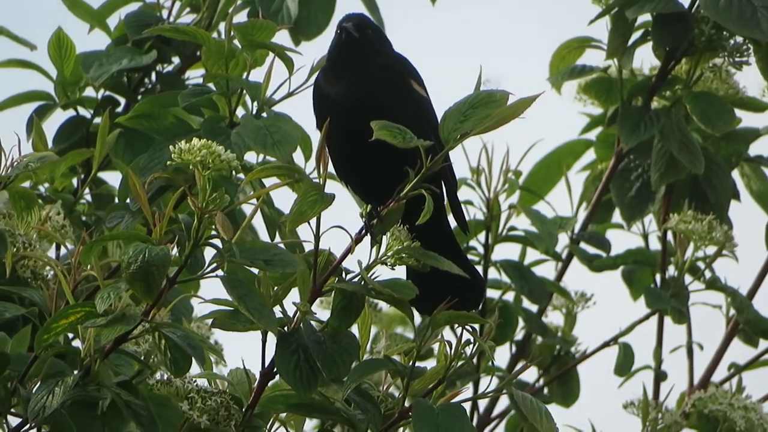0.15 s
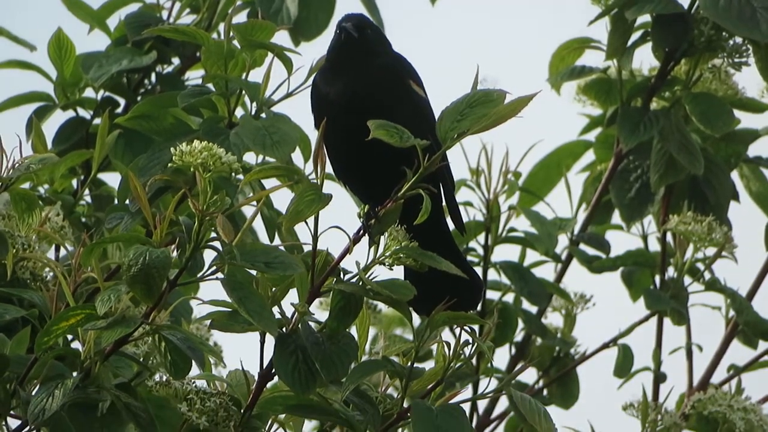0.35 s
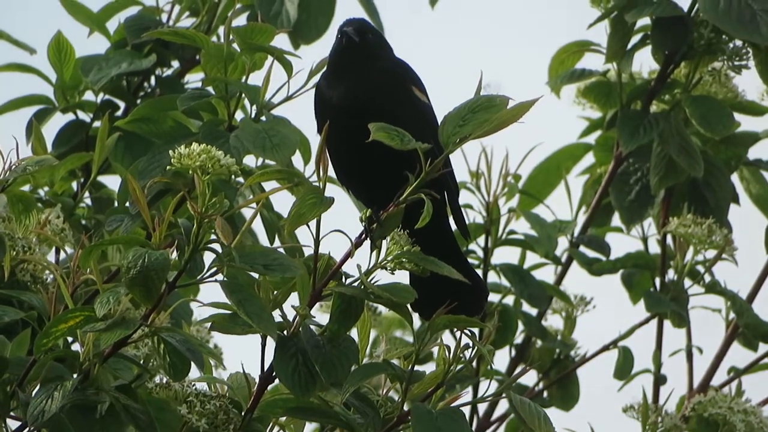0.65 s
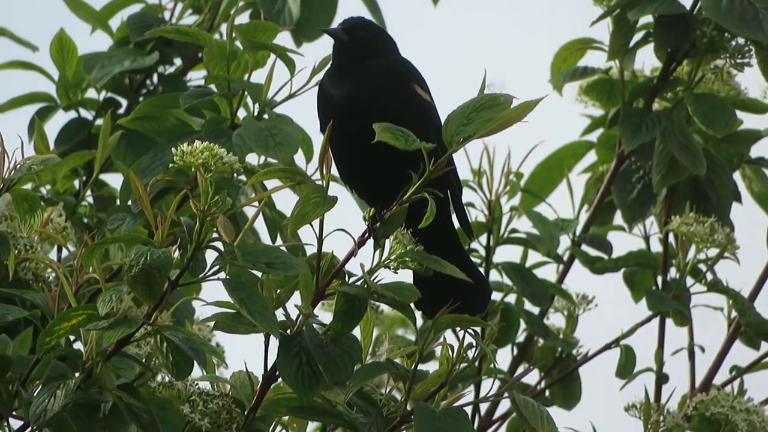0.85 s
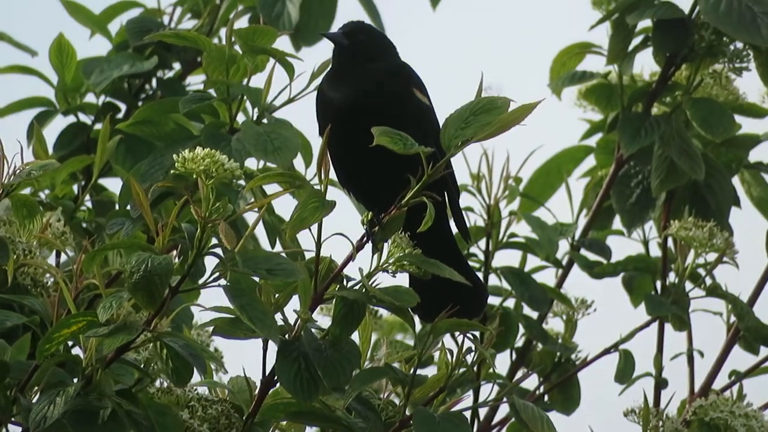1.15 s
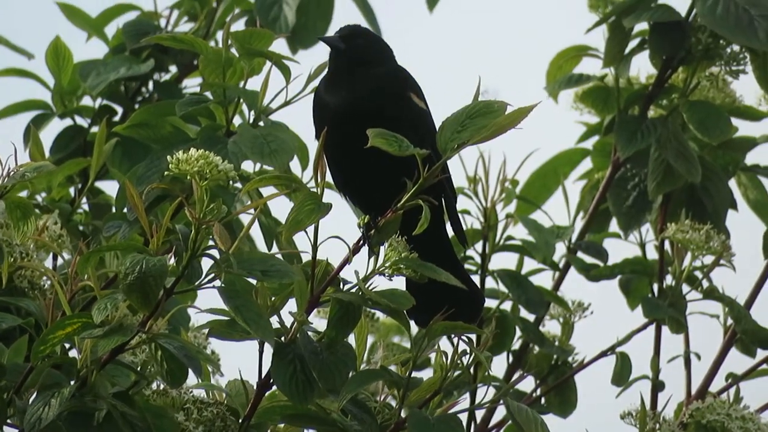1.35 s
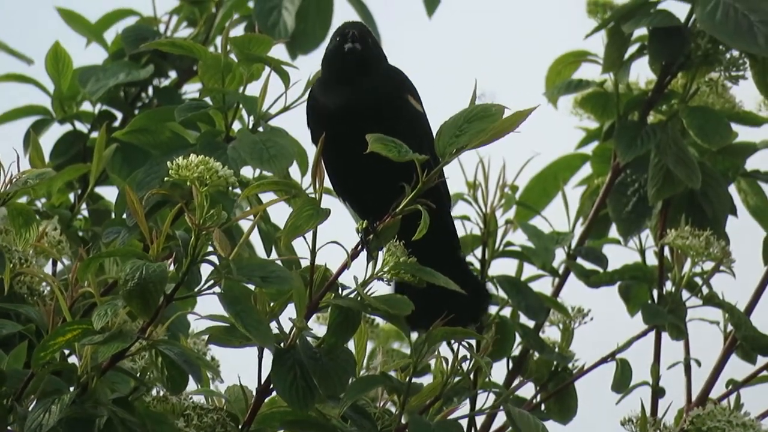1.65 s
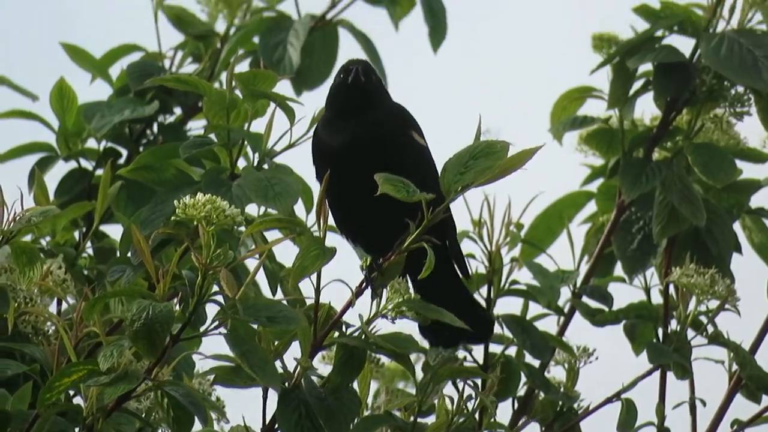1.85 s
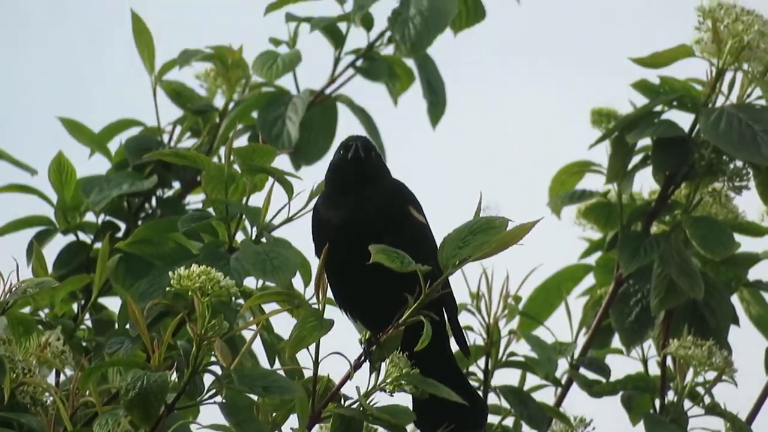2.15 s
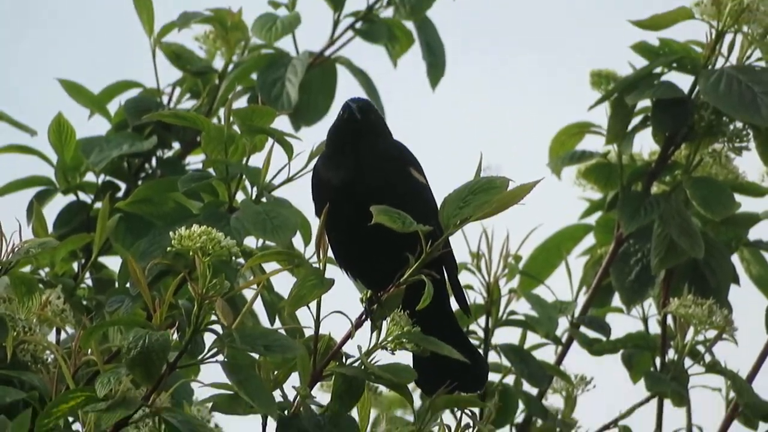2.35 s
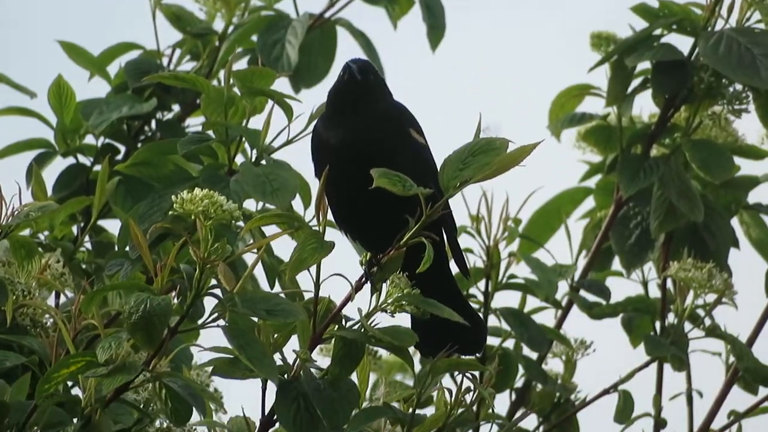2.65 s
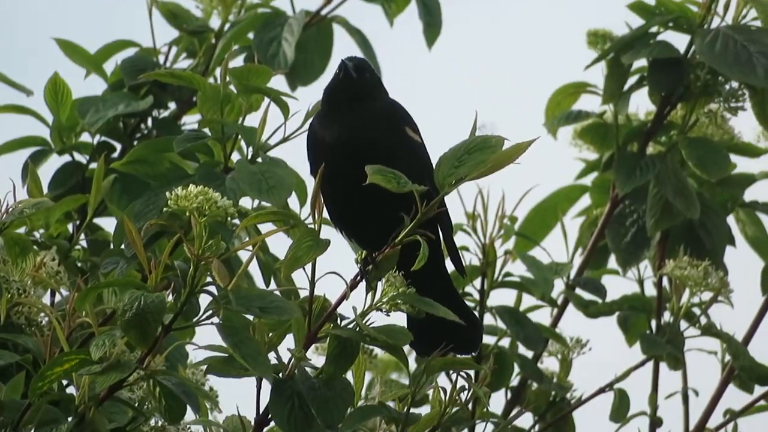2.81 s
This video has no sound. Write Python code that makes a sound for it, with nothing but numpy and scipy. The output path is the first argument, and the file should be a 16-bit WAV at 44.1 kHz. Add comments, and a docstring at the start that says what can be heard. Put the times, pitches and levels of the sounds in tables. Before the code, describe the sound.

Short dry chack calls from a bird in leafy foliage, the middle one by far the loudest, with faint chirps mostly to the right, soft traffic wash and machine hum, heard in stereo outdoors.

```python
"""A blackbird in a leafy bush gives one loud, harsh, nasal chack, with a softer one before and another after.
Each is a harmonic stack with breath noise that sags in pitch and shuts with a rough downward snap.
Other birds, farther off, whistle, buzz and chirp as frequency-modulated sines; foliage scatters every call.
Beneath lie shaped noise, for a low rumble and the wash of distant traffic, and the wavering tones of a
faint machine hum."""
import sys
import numpy as np
from scipy import signal
from scipy.fft import rfft, irfft
from scipy.io import wavfile
from scipy.ndimage import uniform_filter1d

SR = 44100
rng = np.random.default_rng(int(sys.argv[2]) if len(sys.argv) > 2 else 0)


def generate_wav(sig):
    """Save sig (samples, or channels by samples) to the path in sys.argv[1] as 16-bit PCM at SR."""
    pcm = np.round(np.clip(np.atleast_2d(sig).T, -1, 1) * 32767).astype(np.int16)
    wavfile.write(sys.argv[1], SR, pcm)


N = 131418  # samples in the scene

# Spectrum of the rumble and wash, density before scaling: freq_hz, relative_density_db
AIR_SPECTRUM = [(8, -45), (22, -24), (30, -16), (41, -9.5), (53, -1.5), (64, -.5), (84, -5), (112, -6.5),
                (171, -15), (200, -17.5), (270, -17), (375, -21.5), (430, -26), (534, -30.5), (811, -26),
                (1000, -30), (1670, -38.5), (2400, -41.5), (4300, -45.5), (7000, -52), (11700, -59),
                (15500, -68.5)]
# Correlation of the background between left and right: freq_hz, correlation (0-1)
STEREO_LIKENESS = [(150, 0.99), (250, 0.98), (500, 0.8), (1000, 0.92), (2000, 0.17), (4000, 0.21),
                   (8000, 0.21), (15000, 0.25)]
# Slow swell of the traffic wash, full in the bass: time_s, relative_level_db
TRAFFIC_SWELL = [(0, 0), (.8, 0.5), (1.4, 0.9), (2.0, 1), (2.5, -0.1), (2.98, -1)]
# Tones of the machine hum, before wavering: pitch_hz, level_db, wander_hz
HUM_TONES = [(61, -41, 5.7), (99, -43.5, 3.27), (121.4, -49, 3.52), (263, -57, 2.9), (394.5, -51, 0.92),
             (444, -59.5, 0.76)]
# Frequency response of the foliage scatter: freq_hz, relative_level_db
SCATTER_RESPONSE = [(1000, -9), (2500, -1), (3700, 0.5), (4700, 3.5), (5600, -1), (15000, 2)]
# Curves of three whistles, before random motion and trill: time_s, pitch_hz, level_db, trill_depth_hz
SLURRED_WHISTLE = [(1.588, 4230, -60, 200), (1.602, 3980, -48, 250), (1.62, 3900, -51, 230),
                   (1.64, 3880, -49.5, 220), (1.67, 3765, -48.5, 210), (1.70, 3784, -49, 150),
                   (1.727, 3940, -46, 20), (1.745, 4010, -56, 10), (1.762, 4000, -48.5, 10),
                   (1.782, 4060, -58, 10)]
THIN_WHISTLE = [(.15, 4750, -63, 20), (.185, 4780, -58, 20), (.235, 4740, -62, 60), (.25, 4950, -57, 180),
                (.26, 4700, -51.5, 220), (.278, 5200, -58.5, 180), (.29, 4900, -64, 150),
                (.296, 4230, -59, 80), (.31, 3900, -66, 50)]
WARBLE_WHISTLE = [(0.936, 3400, -65, 30), (.968, 2930, -55.5, 30), (.997, 3340, -61, 30),
                  (1.018, 2980, -61, 30)]
# Buzzy notes, pitch after the scoop and level before the fade:
# start_s, length_s, pitch_hz, level_db, flutter_hz, depth_hz, rasp_hz
BUZZ_NOTES = [(0.925, 0.049, 4800, -57, 150, 150, 180), (1.568, 0.057, 4800, -53.5, 153, 200, 240),
              (1.928, 0.074, 3870, -57.5, 150, 80, 50), (1.985, 0.12, 4340, -52, 319, 280, 60.3),
              (2.105, 0.08, 4300, -60, 312, 260, 60), (2.342, 0.14, 4280, -52.5, 312, 270, 70),
              (2.497, 0.038, 4850, -51, 155, 150, 240), (2.685, 0.058, 4630, -55, 150, 200, 380)]
# Falling chirps: start_s, length_s, from_hz, to_hz, level_db
FALLING_CHIRPS = [(2.68, 0.018, 3400, 3000, -58), (2.73, 0.036, 3650, 2360, -50.5),
                  (2.846, 0.021, 6700, 5150, -58), (2.924, 0.034, 3720, 2330, -51)]
# Chacks, before the shared course: start_s, length_s, pitch_hz, rise (share of pitch),
# sag (power of the pitch course), level_db, snap_db, tilt_db_per_khz, left_lead_ms, left_minus_right_db, echo_db
CHACK_NOTES = [(0.0225, 0.038, 685, 0.031, 0.38, -44, 0, -2, 0.022, 0, -22),
               (1.8076, .0452, 675, 0, 1, -26.4, .6, 0, .006, .7, -14.5),
               (2.4455, .0425, 664, -0.0037, 0.56, -46.5, -1, 0, -0.045, -2.5, -11)]
# Course shared by every chack: place (share of length), pitch_ratio, effort_db, brightness_db, lower_resonance_db
CHACK_COURSE = [(0, 1.024, -2, 3.5, 5), (.27, 1.006, 1, 1.5, -.5), (.47, .976, -2, -1.5, -2.5),
                (.66, .995, -1.3, 0, -3), (.85, .998, -3.2, 1, 0), (1, 1.012, -2.5, 1, 3.5)]
# Harmonics of the chack, before scaling: harmonic (number), relative_level_db
VOICE_HARMONICS = [(1, -35), (2, -8.5), (3, -15), (4, -13), (5, -2.5), (6, -13), (7, 0.5), (8, -12.5),
                   (9, -13.5), (10, -25), (11, -31), (12, -29), (13, -29.5), (14, -29.5), (15, -40),
                   (16, -36), (17, -27.5), (18, -36), (19, -27), (20, -36), (21, -32), (22, -42), (23, -43)]
# Nearby reflections of the chacks: delay_s, relative_level_db
REFLECTIONS = [(.009, -19), (.021, -27), (.04, -24)]

# Background and hum
AIR_DB, PATCH_DB = -32.5, 1.55
MONO_BELOW_HZ, TRAFFIC_TOP_HZ = 150, 890
HUM_WAVER_DB = 1.3

# Foliage: time to decay by 60 dB, and delay before the first scatter
BUSH_T60_S, BUSH_DELAY_S = 0.19, 0.0077

# Far birds; scoop and flutter jitter are shares of the pitch and the flutter rate
TRILL_HZ, FLUTTER_JITTER, PULSE_DB_PER_HZ = 155, .025, .02
SCOOP, SCOOP_S, BUZZ_RISE_S, BUZZ_FADE_DB = 0.22, 0.011, .018, -7.5
CHIRP_BEND = 1.2  # power of the sweep
FAR_LEAD_MS, FAR_BALANCE_DB, FAR_ECHO_DB = -0.054, -2.6, -8.5
THIN_ECHO_DB = -13

# Chack voice; jitter is a share of pitch, shimmer a share of amplitude
ATTACK_S, JITTER, SHIMMER, BREATH_DB = .0003, .006, .09, -24
OPEN_S, OPEN_RASP_DB = .003, 12  # a burst of breath noise at the opening
RASP_DB, RASP_TILT_DB_PER_KHZ = 15, .5  # extra breath noise at the shut; treble tilt of all breath noise
FLICKER_DB, FLICKER_DB_PER_KHZ = .5, .2  # random level motion of each harmonic
DISPERSION_RAD = .55  # phase lag, times harmonic number squared
BRIGHT_FROM, BRIGHT_SPAN = 7.5, 1.8  # in harmonics: those above the strongest follow the brightness
LOWER_HZ, LOWER_WIDTH_HZ = 3700, 620  # lower throat resonance, prominent as the note opens and shuts

# Closing: the pitch drops by a share and turns rough as the note shuts
CLOSE_S, CLOSE_DROP, CLOSE_JITTER, RELEASE_S = 0.0077, 0.196, 0.018, 0.0031
# Meanwhile the upper resonance slides down and the harmonic stack fades
SNAP_END_HZ, SNAP_ROUGH, STACK_FADE_DB = 3573, 0.52, -4
# A tiny upward squeak just before each chack, its level relative to the chack's
LEAD_S, LEAD_LENGTH_S, LEAD_FROM_HZ, LEAD_TO_HZ, LEAD_DB = 0.0061, 0.0033, 2850, 4200, -21

EDGE_HZ = 15700  # upper limit of the band


def amp(db):
    """Logarithmic level: converts decibels to an amplitude ratio."""
    return 10 ** (np.asarray(db) / 20)


def unit(x):
    """Power normalisation: scales to rms 1."""
    return x / np.sqrt(np.mean(x ** 2) + 1e-20)


def read(points, hz):
    """Spectral interpolation on a logarithmic frequency axis."""
    f, value = np.transpose(points)
    return np.interp(np.log(hz + 1), np.log(f + 1), value)


def add(mix, start_s, sound):
    """Linear superposition: adds a stereo sound from a given time."""
    part = mix[:, max(round(start_s * SR), 0):][:, :sound.shape[1]]
    part += sound[:, :part.shape[1]]


def drift(size, rate_hz):
    """Low-pass filtered noise: smooth random motion of rms about 1."""
    span = 2 ** int(np.ceil(np.log2(max(size, SR // 4))))
    hz = np.fft.rfftfreq(span, 1 / SR)
    spectrum = rfft(rng.standard_normal(span)) / (1 + (hz / rate_hz) ** 4)
    return unit(irfft(spectrum))[:size]


def tone(hz):
    """Phase integration: a sine of rms 1 along a pitch curve."""
    return np.sqrt(2) * np.sin(2 * np.pi * np.cumsum(hz) / SR)


def place(x, lead_ms, balance_db, echo_db):
    """Interaural time and level differences, plus diffuse scatter from foliage as sparse decaying taps."""
    x = np.pad(x, (0, SR // 2))
    hz = np.fft.rfftfreq(len(x), 1 / SR)
    spectrum = rfft(x)
    side = np.array([[.5], [-.5]])  # left and right share each difference
    time_shift = np.exp(2j * np.pi * hz * side * lead_ms / 10 ** 3)
    direct = irfft(spectrum * amp(side * balance_db) * time_shift, len(x))

    t = np.arange(SR // 2) / SR
    taps = rng.standard_normal((3, len(t))) * (rng.random((3, len(t))) < .1)
    # each side has its own taps and a common set
    tail = (taps[:2] + taps[2]) * amp(-60 * t / BUSH_T60_S) * (t > BUSH_DELAY_S)
    tail /= np.linalg.norm(tail, axis=1, keepdims=True)
    scatter_gain = amp(echo_db + read(SCATTER_RESPONSE, hz))
    return direct + irfft(spectrum * rfft(tail, len(x)) * scatter_gain, len(x))


def background():
    """Spectrally shaped noise: patchy rumble and wash, mono in the bass, with a slow swell fullest in the bass."""
    frames, hz = N // 1024 + 9, np.fft.rfftfreq(4096, 1 / SR)
    a, b, c, d, patches = rng.standard_normal((5, frames, len(hz))).transpose(0, 2, 1)
    patches = uniform_filter1d(patches, size=30, axis=0)  # smooth across frequency
    patches = unit(uniform_filter1d(patches, size=5, axis=1))  # then across time

    same = np.where(hz < MONO_BELOW_HZ, 1, np.clip(read(STEREO_LIKENESS, hz), 0, 1))[:, None]
    mid = np.sqrt(1 + same) * (a + 1j * b)
    side = np.sqrt(1 - same) * (c + 1j * d)

    s = (np.arange(frames) - 4) * 1024 / SR
    swell_db = np.interp(s, *np.transpose(TRAFFIC_SWELL)) / (1 + (hz[:, None] / TRAFFIC_TOP_HZ) ** 2)
    level_db = read(AIR_SPECTRUM, hz)[:, None] + PATCH_DB * patches + swell_db
    spectrum = np.array([mid + side, mid - side]) * amp(level_db)
    wash = signal.istft(spectrum, nperseg=4096, noverlap=3072)[1][:, 4096:4096 + N]
    return amp(AIR_DB) * unit(wash)


def hum():
    """Narrow-band tones: distant machinery as sines that waver in pitch and level."""
    total = 0
    for hz, db, wander_hz in HUM_TONES:
        wavering = tone(hz + wander_hz * drift(N, 7.85))
        total = total + wavering * amp(db + HUM_WAVER_DB * drift(N, 2.6))
    return total


def flutter(size, rate_hz):
    """Periodic modulation: a fast, slightly uneven sine that drives a trill."""
    uneven_hz = rate_hz * (1 + FLUTTER_JITTER * drift(size, 60))
    return np.sin(2 * np.pi * np.cumsum(uneven_hz) / SR)


def trilled(hz, swing_hz):
    """Coupled frequency and amplitude modulation: louder at the bottom of each pitch swing."""
    return tone(hz + swing_hz) * amp(-PULSE_DB_PER_HZ * swing_hz)


def whistle(curve):
    """Frequency modulation: a gliding whistle whose trill swings pitch and loudness together."""
    s, hz, db, depth_hz = np.transpose(curve)
    t = np.arange(s[0], s[-1], 1 / SR)
    pitch = np.interp(t, s, hz) + 25 * drift(len(t), 210)
    swing = np.interp(t, s, depth_hz) * flutter(len(t), TRILL_HZ)
    return trilled(pitch, swing) * amp(np.interp(t, s, db)) * signal.windows.tukey(len(t), .1)


def buzz(length, hz, db, rate_hz, depth_hz, rasp_hz):
    """Fast frequency modulation: a fluttering note scoops up and fades; random pitch shake makes it raspy."""
    t = np.arange(0, length, 1 / SR)
    pitch = hz * (1 - SCOOP * np.exp(-t / SCOOP_S)) + rasp_hz * drift(len(t), 410)
    edges = np.clip(np.minimum(t, length - t) / BUZZ_RISE_S, 0, 1)
    envelope = edges * amp(db + BUZZ_FADE_DB * (t / length) ** 2)
    return trilled(pitch, depth_hz * flutter(len(t), rate_hz)) * envelope


def chirp(length, from_hz, to_hz, db):
    """Swept sine: a quick pure glide under a rounded envelope."""
    u = np.arange(0, length, 1 / SR) / length
    pitch = from_hz + (to_hz - from_hz) * u ** CHIRP_BEND
    return tone(pitch) * np.sin(np.pi * u) ** 0.43 * amp(db)


def far_birds():
    """Lateral localisation: most neighbours sit to the right, the thin whistle to the left."""
    out = np.zeros((2, N))
    right = (FAR_LEAD_MS, FAR_BALANCE_DB, FAR_ECHO_DB)
    for curve in (SLURRED_WHISTLE, WARBLE_WHISTLE):
        add(out, curve[0][0], place(whistle(curve), *right))
    thin = place(whistle(THIN_WHISTLE), lead_ms=0.035, balance_db=2.0, echo_db=THIN_ECHO_DB)
    add(out, THIN_WHISTLE[0][0], thin)
    for start, *note in BUZZ_NOTES:
        add(out, start, place(buzz(*note), *right))
    for start, *note in FALLING_CHIRPS:
        add(out, start, place(chirp(*note), *right))
    return out


def harmonic_stack(u, hz, turn, tilt_db):
    """Additive synthesis: harmonics with random flicker, moving brightness and a throat resonance."""
    at, _, _, bright_db, lower_db = np.transpose(CHACK_COURSE)
    bright = np.interp(u, at, bright_db)
    lower = np.interp(u, at, lower_db)
    stack = 0
    for k, (_, level) in enumerate(VOICE_HARMONICS, 1):
        khz = k * hz / 10 ** 3
        level += tilt_db * khz + bright * np.clip((k - BRIGHT_FROM) / BRIGHT_SPAN, 0, 1)
        level += lower * np.exp(-((k * hz - LOWER_HZ) / LOWER_WIDTH_HZ) ** 2)
        flicker_db = (FLICKER_DB + FLICKER_DB_PER_KHZ * khz) * drift(len(u), 150)
        stack = stack + amp(level + flicker_db) * np.cos(k * turn - DISPERSION_RAD * k ** 2)
    return unit(stack)


def breath(size, hz):
    """Filtered turbulence: noise of rms 1 that follows the outline of the harmonics."""
    outline = [(k * hz, level + RASP_TILT_DB_PER_KHZ * k * hz / 10 ** 3) for k, level in VOICE_HARMONICS]
    colour = amp(read(outline, np.fft.rfftfreq(size, 1 / SR)))
    return unit(irfft(rfft(rng.standard_normal(size)) * colour, size))


def closing_snap(hz, turn, close, snap_db):
    """Gliding resonance: a sine falls from the seventh harmonic, rough at the rate of the voice."""
    slide = tone(SNAP_END_HZ + (7 * hz - SNAP_END_HZ) * (1 - close) ** 3)
    roughness = 1 + SNAP_ROUGH * close * (np.cos(turn) + drift(len(close), 900) / 2)
    return slide * roughness * np.sqrt(close) * amp(snap_db)


def chack(length, hz, rise, sag, db, snap_db, tilt_db):
    """Voiced source plus noise: a reedy stack bursts open with a rasp, sags and shuts with a rough snap."""
    t = np.arange(0, length + CLOSE_S + 6 * RELEASE_S, 1 / SR)
    u = t / length
    at, ratio, effort_db, _, _ = np.transpose(CHACK_COURSE)
    close = np.clip((t - length) / CLOSE_S, 0, 1)  # 0 open, 1 shut

    pitch = hz * np.interp(u, at, ratio) ** sag
    pitch *= (1 + rise * (u - .5)) * (1 - CLOSE_DROP * close)
    pitch *= 1 + (JITTER + CLOSE_JITTER * close) * drift(len(t), 740)
    turn = 2 * np.pi * np.cumsum(pitch) / SR

    stack = harmonic_stack(u, hz, turn, tilt_db) * (1 + SHIMMER * drift(len(t), 550))
    stack *= amp(STACK_FADE_DB * np.sqrt(close))
    rasp_db = RASP_DB * np.sqrt(close) + OPEN_RASP_DB * np.exp(-t / OPEN_S)
    rasp = amp(BREATH_DB + rasp_db) * breath(len(t), hz)
    snap = closing_snap(hz, turn, close, snap_db)

    release = np.exp(-np.maximum(t - length - CLOSE_S, 0) / RELEASE_S)
    envelope = np.minimum(t / ATTACK_S, 1) * release
    return (stack + rasp + snap) * envelope * amp(db + np.interp(u, at, effort_db))


def blackbird():
    """Direct sound and early reflections: each chack with its opening squeak and a few close echoes."""
    out = np.zeros((2, N))
    for start, length, hz, rise, sag, db, snap_db, tilt_db, *where in CHACK_NOTES:
        sound = place(chack(length, hz, rise, sag, db, snap_db, tilt_db), *where)
        add(out, start, sound)
        squeak = chirp(LEAD_LENGTH_S, LEAD_FROM_HZ, LEAD_TO_HZ, db + LEAD_DB)
        add(out, start - LEAD_S, place(squeak, *where))
        for delay, echo_db in REFLECTIONS:
            add(out, start + delay, amp(echo_db) * sound)
    return out


def scene():
    """Superposition of sources: the birds over the outdoor background."""
    return background() + hum() + far_birds() + blackbird()


def record(dry):
    """Band limitation: a steep linear-phase low-pass filter."""
    lowpass = signal.firwin(511, EDGE_HZ, window=("kaiser", 9), fs=SR)
    return signal.oaconvolve(dry, lowpass[None], "same")


dry = scene()
out = record(dry)
generate_wav(out)
```